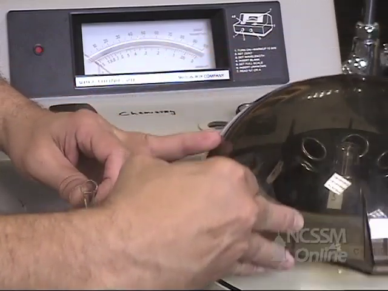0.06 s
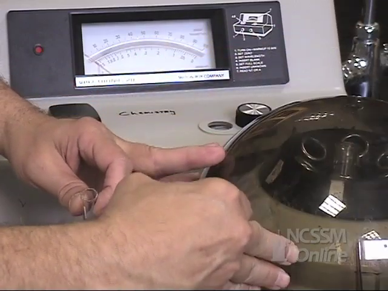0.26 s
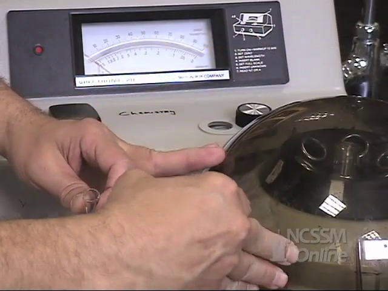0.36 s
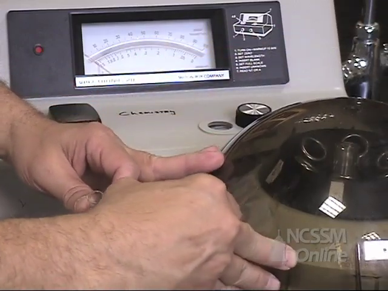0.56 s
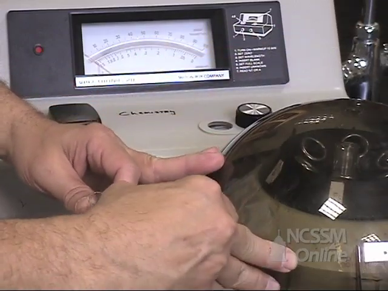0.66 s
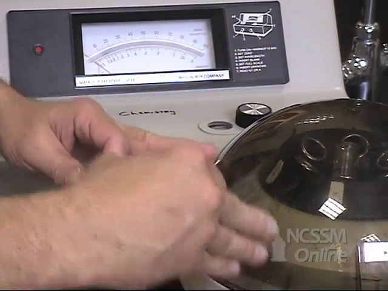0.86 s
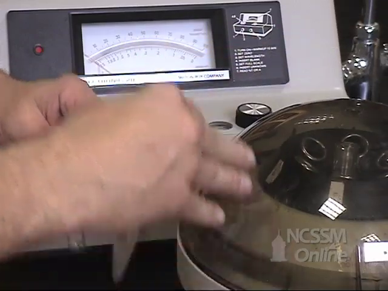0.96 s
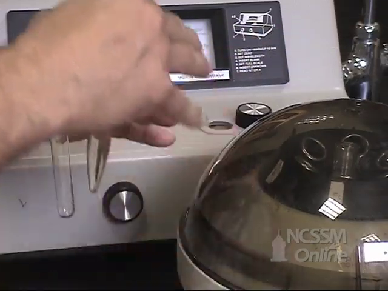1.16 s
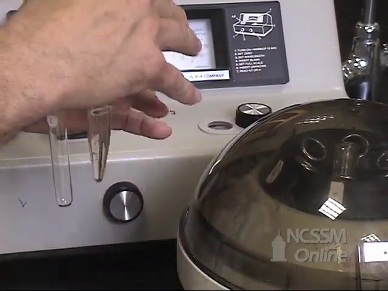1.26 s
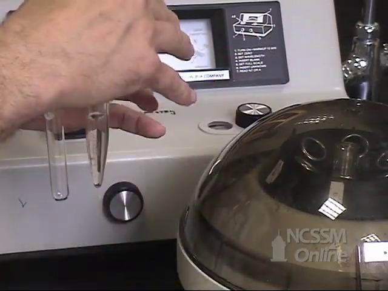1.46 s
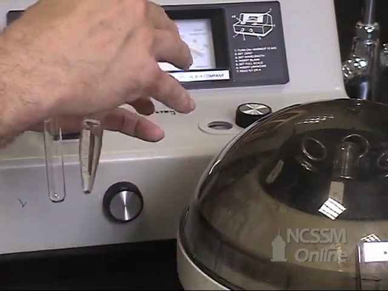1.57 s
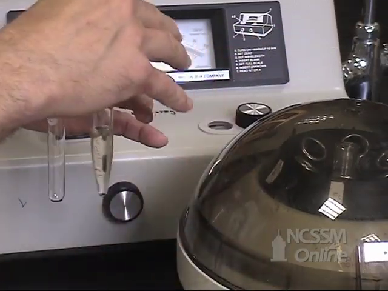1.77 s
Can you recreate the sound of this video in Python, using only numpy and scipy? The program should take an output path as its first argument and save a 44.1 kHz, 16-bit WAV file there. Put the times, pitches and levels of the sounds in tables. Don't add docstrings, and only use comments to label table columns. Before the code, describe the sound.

Glass tubes knock as they are lifted from a bench centrifuge. After a barely audible slide and rustle, a sharp clack lands at 0.24 s, with a brighter rebound at 0.27 s. A duller, low-bodied bump hits the housing at 0.62 s. Tiny glass ticks scatter from 1.27 to 1.66 s. A low, wavering fan hum, room air and faint hiss continue throughout; hard laboratory walls echo the close knocks.

```python
import sys
import numpy as np
from scipy import signal
from scipy.fft import rfft, irfft
from scipy.io import wavfile

SR = 44100
rng = np.random.default_rng(int(sys.argv[2]) if len(sys.argv) > 2 else 0)


def volts_from_db(level):
    exponent = np.asarray(level, float) / 20
    return 10 ** exponent


def unload_audio(sound):
    columns = np.transpose(np.atleast_2d(sound))
    steps = np.round(np.clip(columns, -1, 1) * 32767)
    wavfile.write(sys.argv[1], SR, steps.astype(np.int16))


N = 79380

# order/1, level/dB rms
FAN_ORDERS = [(1, -51.5), (2, -60.5), (3, -52.5), (5, -55.5), (6, -59), (8, -59.5), (9, -57.5)]
# t/s, level/dB rms
FOURTH_ORDER_LEVEL = [(0, -44), (.15, -43.5), (.38, -35.5), (.55, -42), (.75, -48), (.88, -42.5),
                      (.98, -36.5), (1.06, -43.5), (1.14, -38.5), (1.3, -40), (1.45, -41), (1.6, -48.5),
                      (1.8, -41.5)]
FAN_HZ, WAVER_DB, WAVER_DB_PER_S = 55.58, 2.5, 17.7
WAVER_RAD, WAVER_RAD_PER_S = 0.45, 6
MAINS_HZ, MAINS_DB = 120, -58.5
SCAN_HZ, SCAN_DB = 15734, -80
# f/Hz, density/dB per Hz
AIR_SPECTRUM = [(12, -34), (20, 1), (90, -16), (166, -13.5), (188, -25.5), (223, -12), (305, -8.5),
                (494, -16), (3000, -36), (3900, -60), (6600, -120)]
# f/Hz, density/dB per Hz
HISS_SPECTRUM = [(1500, -47), (3000, 1.5), (7000, -6.5), (12000, -8), (15700, -7)]
AIR_DB, HISS_DB = -46, -63.5

# t/s, level/dB, t60/s
SLIDE_BURSTS = [
    (.066, -47, 0.13),
]
# f/Hz, level/dB, t60/s
SLIDE_MODES = [(1630, -15, 0.016), (1860, -13.5, 0.0045)]
# t/s, level/dB, t60/s
RUSTLE_BURSTS = [
    (.2185, -43.5, 0.3),
]
# f/Hz, level/dB, t60/s
RUSTLE_MODES = [(4000, -4, 0.0017), (6600, -24, 0.0019)]
# t/s, level/dB, t60/s
KNOCK_BURSTS = [
    (.2362, -26.5, 0.039),
    (.2394, -19.5, .015),
    (.2428, -24.5, 0.034),
    (.2520, -26, 0.054),
]
# f/Hz, level/dB, t60/s
KNOCK_MODES = [(1400, -18, 0.004), (1620, -3.5, 0.018), (3140, -7, 0.0029), (3980, -13.5, 0.005),
               (4480, -17, 0.024), (4800, -10.5, 0.003), (5760, -20, 0.0056), (6700, -43, 0.018)]
# t/s, level/dB, t60/s
GRAZE_BURSTS = [
    (.2676, -17.5, 0.024),
]
# f/Hz, level/dB, t60/s
GRAZE_MODES = [(5270, -0.5, 0.0045), (6170, -2, 0.0038), (6850, -17, 0.0073), (10900, -11, 0.0018)]
# t/s, level/dB, t60/s
REBOUND_BURSTS = [
    (.2695, -20.5, 0.03),
    (.2725, -28, 0.06),
    (.2800, -24, 0.018),
    (.2905, -34.5, 0.091),
]
# f/Hz, level/dB, t60/s
REBOUND_MODES = [(1200, -35, 0.034), (1907, -8, 0.02), (2500, -11, 0.0046), (3080, -50, .06),
                 (3360, -3.5, 0.0054), (3965, -15.5, 0.047), (4900, -38, 0.037), (4630, -5, 0.0037),
                 (6300, -39, 0.024), (7050, -44, 0.0093), (8040, -53, 0.012)]
# t/s, level/dB, t60/s
BUMP_BURSTS = [
    (.6150, -47.5, 0.09),
    (.6218, -22, 0.04),
    (.6265, -55, 0.047),
    (.6350, -46.5, 0.043),
]
# f/Hz, level/dB, t60/s
BUMP_MODES = [(1310, -14, 0.01), (1537, -6, 0.0098), (2130, -4.5, 0.005), (3220, -4.5, 0.004),
              (4030, -10.5, 0.0031), (5010, -16.5, 0.0056), (6390, -21.5, 0.0071), (8640, -42, 0.0012)]
# t/s, level/dB, t60/s
CRACK_BURSTS = [
    (.2394, -19, .014),
    (.2700, -21, .02),
]
# f/Hz, level/dB, t60/s
CRACK_MODES = [(4640, -20, .003), (7200, -8, 0.0072), (10700, -43, 0.0016), (13900, -24, .002)]
SLIPS_PER_S, SLIP_RISE_S = 14000, 0.00054

# t/s, level/dB, f/Hz, t60/s
PINGS = [(.2075, -43, 1620, .04), (.2392, -24, 1628, .06), (.2415, -20, 1540, .045),
         (.2426, -22, 1628, .055), (.2430, -27, 1890, .045), (.2515, -28, 1600, .045),
         (.2700, -24, 5135, .05), (.2705, -30, 2146, .05), (.2710, -38, 5200, .3), (.2712, -38, 6400, .2),
         (.2715, -34, 3080, .08), (.6225, -26, 1500, .025), (.6260, -35, 1793, .12)]
# t/s, level/dB, f/Hz, t60/s
THUDS = [(.2400, -20.5, 233.4, 0.22), (.2410, -26.5, 627, .07), (.2500, -25.5, 355.6, 0.11),
         (.2660, -20.5, 538, 0.058), (0.2663, -15.5, 211.3, .1), (0.2705, -21.5, 54.4, 0.043),
         (0.314, -31.5, 52.3, 0.28), (0.6198, -7, 234.7, 0.03), (.6210, -21.5, 512, 0.031),
         (.6215, -30, 679, 0.064), (.6240, -24, 366.5, 0.13), (.6270, -16.5, 309, 0.058),
         (0.637, -15.5, 116.6, 0.096), (.6450, -29, 104, 0.11), (0.71, -35, 113, 0.11)]
BODY_CONTACT_CYCLES = 1.6
# t/s, level/dB, f/Hz
TICKS = [(1.2674, -45, 7900), (1.2674, -33, 4970), (1.2878, -44, 4200), (1.2925, -36, 4300),
         (1.3048, -56, 4800), (1.3950, -31.5, 4000), (1.4310, -47, 7200), (1.4545, -49, 3100),
         (1.512, -41, 3340), (1.656, -48, 3460)]
TICK_T60_CYCLES, TICK_CONTACT_CYCLES = 13, 3.5
# f/Hz, t60/s
ROOM_T60 = [(100, 0.72), (500, 1), (2000, 0.44), (5000, 0.58), (9000, 0.32), (14000, 0.38)]
ROOM_DB, ROOM_BUILDUP_S = -13.5, 0.002


def at_hz(points, hz):
    p = np.array(points, float)
    return np.interp(np.log(np.maximum(hz, 1)), np.log(p[:, 0]), p[:, 1])


def rms_one(x):
    return x / np.sqrt(np.mean(x ** 2) + 1e-20)


def drift(rate_hz):
    r = np.exp(-2 * np.pi * rate_hz / SR)
    noise = rng.standard_normal(N + SR)
    return rms_one(signal.lfilter([1], [1, -2 * r, r * r], noise)[SR:])


def hum():
    t = np.arange(N) / SR
    lines = [(order * FAN_HZ, db) for order, db in FAN_ORDERS]
    lines.append((4 * FAN_HZ, np.interp(t, *np.transpose(FOURTH_ORDER_LEVEL))))
    out = np.zeros(N)
    for hz, db in lines:
        level = volts_from_db(db + WAVER_DB * drift(WAVER_DB_PER_S))
        phase = WAVER_RAD * drift(WAVER_RAD_PER_S) + 2 * np.pi * rng.random()
        out += level * np.sin(2 * np.pi * hz * t + phase)
    out += volts_from_db(MAINS_DB) * np.sin(2 * np.pi * MAINS_HZ * t)
    out += volts_from_db(SCAN_DB) * np.sin(2 * np.pi * SCAN_HZ * t)
    return np.sqrt(2) * out


def coloured(spectrum):
    hz = np.fft.rfftfreq(N, 1 / SR)
    white = rfft(rng.standard_normal(N))
    return rms_one(irfft(white * volts_from_db(at_hz(spectrum, hz)), N))


def air():
    return volts_from_db(AIR_DB + 0.17 * drift(2.3)) * coloured(AIR_SPECTRUM)


def hiss():
    return volts_from_db(HISS_DB) * coloured(HISS_SPECTRUM)


def ring(force, hz, t60_s):
    r = volts_from_db(-60 / (max(t60_s, .001) * SR))
    w = 2 * np.pi * hz / SR
    return signal.lfilter([0, np.sin(w)], [1, -2 * r * np.cos(w), r * r], force + 1e-18)


def knock(bursts, modes):
    t = np.arange(N) / SR
    occurs = rng.random(N) < SLIPS_PER_S / SR
    slips = rms_one(occurs * rng.uniform(-1, 1, N))
    envelope = np.zeros(N)
    for start_s, db, t60_s in bursts:
        age = np.maximum(t - start_s, 0)
        envelope += (1 - np.exp(-age / SLIP_RISE_S)) * volts_from_db(db - 60 * age / t60_s)
    drive = slips * envelope
    return sum(volts_from_db(db) * ring(drive, hz, t60_s) for hz, db, t60_s in modes) / 3


def clacks():
    out = knock(KNOCK_BURSTS, KNOCK_MODES) + knock(REBOUND_BURSTS, REBOUND_MODES)
    out += knock(BUMP_BURSTS, BUMP_MODES) + knock(SLIDE_BURSTS, SLIDE_MODES)
    out += knock(RUSTLE_BURSTS, RUSTLE_MODES) + knock(GRAZE_BURSTS, GRAZE_MODES)
    band = signal.butter(3, [1100, 9000], "band", fs=SR, output="sos")
    return signal.sosfilt(band, out)


def swell(start_s, db, hz, t60_s, contact_cycles):
    n = int(contact_cycles * SR / hz) + 3
    push = np.hanning(n) * np.cos(2 * np.pi * hz * (np.arange(n) - n / 4) / SR)
    start = int(start_s * SR)
    force = np.zeros(N + SR)
    force[start:start + n] = -4 * push / n
    return volts_from_db(db) * ring(force[:N], hz, t60_s)


def pings():
    return sum(swell(*row, BODY_CONTACT_CYCLES) for row in PINGS)


def thuds():
    return sum(swell(*row, BODY_CONTACT_CYCLES) for row in THUDS)


def cracks():
    return knock(CRACK_BURSTS, CRACK_MODES)


def ticks():
    return sum(swell(start_s, db, hz, TICK_T60_CYCLES / hz, TICK_CONTACT_CYCLES)
               for start_s, db, hz in TICKS)


def room(x):
    t = np.arange(SR) / SR
    edges_hz = 60 * 2 ** np.arange(0, 8.1, .5)
    white = rng.standard_normal((2, SR))
    echo = np.zeros(SR)
    for k, (low, high) in enumerate(zip(edges_hz, edges_hz[1:])):
        sos = signal.butter(2, [low, high], "band", fs=SR, output="sos")
        t60_s = at_hz(ROOM_T60, np.sqrt(low * high))
        echo += signal.sosfilt(sos, white[k % 2]) * volts_from_db(-60 * t / t60_s)
    echo *= 1 - np.exp(-(t / ROOM_BUILDUP_S) ** 2)
    echo /= np.sqrt(np.sum(echo ** 2))
    return volts_from_db(ROOM_DB) * signal.fftconvolve(x, echo)[:N]


def scene():
    hits = clacks() + cracks() + thuds() + pings() + ticks()
    return (hits + room(hits) + hum() + air() + hiss())[None]


def band_limit(x):
    return signal.sosfilt(signal.butter(12, 16430, fs=SR, output="sos"), x)


def record(dry):
    rumble_cut = signal.butter(1, 15, "high", fs=SR, output="sos")
    treble_cut = signal.cheby2(12, 26, 15900, fs=SR, output="sos")
    mix = signal.sosfilt(treble_cut, signal.sosfilt(rumble_cut, dry))
    return band_limit(mix)


dry = scene()
out = record(dry)
unload_audio(out)
```